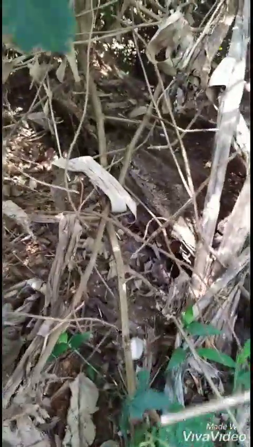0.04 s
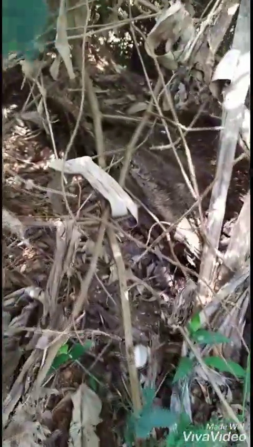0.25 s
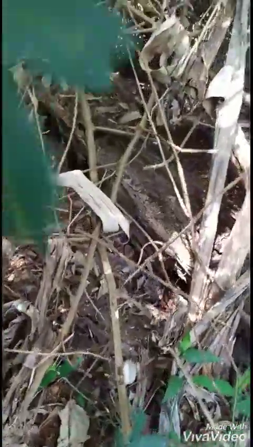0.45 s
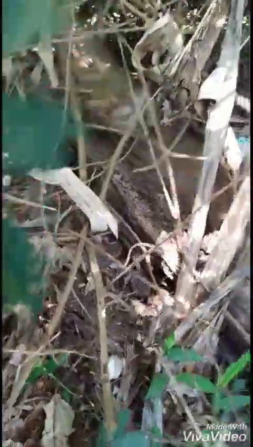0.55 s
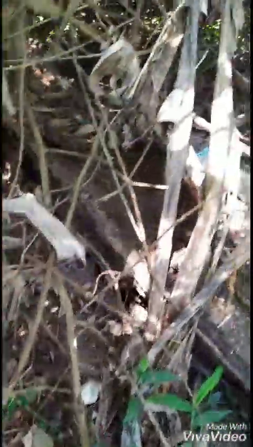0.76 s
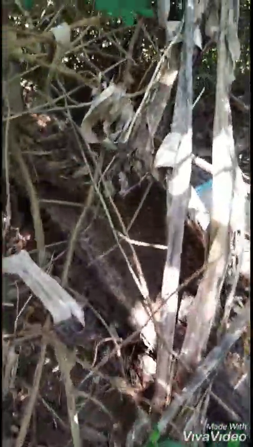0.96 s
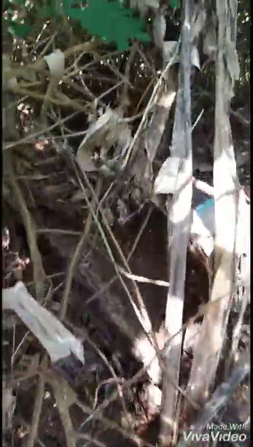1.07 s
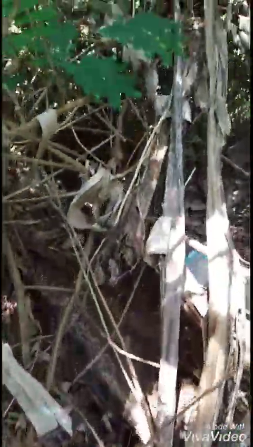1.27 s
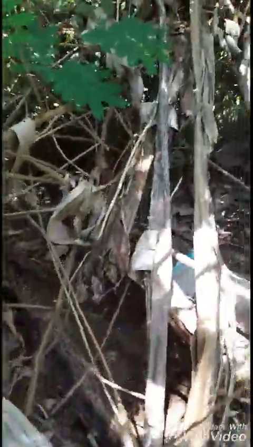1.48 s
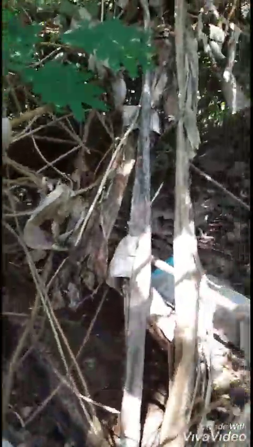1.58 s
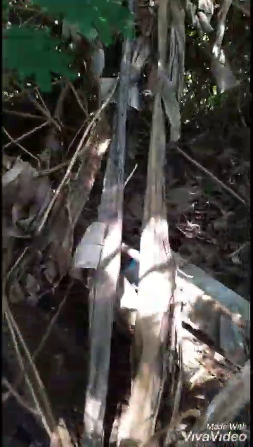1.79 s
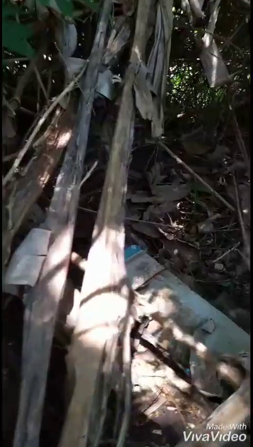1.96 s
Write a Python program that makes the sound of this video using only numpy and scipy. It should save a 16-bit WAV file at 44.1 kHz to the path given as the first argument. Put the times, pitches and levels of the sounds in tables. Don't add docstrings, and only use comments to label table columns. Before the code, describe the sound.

Dry leaves and brush rustle softly, twigs ticking, then a hard shove crackles with sharp snaps

```python
import sys
import numpy as np
from scipy import signal
from scipy.fft import rfft, irfft
from scipy.io import wavfile
from scipy.ndimage import uniform_filter1d

SR = 44100
rng = np.random.default_rng(int(sys.argv[2]) if len(sys.argv) > 2 else 0)


def waveform_to_disk(signal):
    frames = np.transpose(np.atleast_2d(signal))
    scaled = np.clip(frames, -1, 1) * 32767
    samples = np.round(scaled).astype(np.int16)
    wavfile.write(sys.argv[1], SR, samples)


def volts_from_db(level):
    exponent = np.asarray(level, float) / 20
    return 10 ** exponent


N = 89214
LAG_S = 0.0004363


def evened(x):
    return x / np.sqrt(np.mean(x ** 2) + 1e-20)


def read(points, hz):
    f, value = np.transpose(points)
    return np.interp(np.log(hz + 1), np.log(f + 1), value)


def coloured(x, points, lag_s=0.):
    hz = np.fft.rfftfreq(x.shape[-1], 1 / SR)
    delay = np.exp(-2j * np.pi * hz * lag_s)
    return irfft(rfft(x) * volts_from_db(read(points, hz)) * delay, x.shape[-1])


# f/Hz, level/dB
SHADOW = [(300, -2), (2000, -4), (8000, -3.5), (14000, -7.5)]


def shadowed(x, lag_s=0.):
    return coloured(x, SHADOW, lag_s)


def paired(a, b, likeness):
    hz = np.fft.rfftfreq(N, 1 / SR)
    same = np.clip(read(likeness, hz), 0, 1)
    shared = same * rfft(a) * np.exp(-2j * np.pi * hz * LAG_S)
    own = np.sqrt(1 - same ** 2) * rfft(b)
    return np.array([a, irfft(shared + own, N)])


def add(mix, s, sound):
    part = mix[:, round(s * SR):][:, :sound.shape[1]]
    part += sound[:, :part.shape[1]]


def smoothed(x, n):
    return uniform_filter1d(uniform_filter1d(x, n), n)


def drift(width_s):
    return evened(smoothed(rng.standard_normal(N), max(int(width_s * SR), 2)))


# f/Hz, level/dB
AIR_COLOUR = [(12, -76), (20, -18), (75, 0), (147, -24.5), (244, -21.5), (1050, -22), (1790, -29.5),
              (13200, -32), (16500, -39)]
# f/Hz, likeness (0 to 1)
AIR_SAME = [(60, 0.72), (300, 1), (900, 0.56), (3000, 0.13), (10000, 0.047)]
# t/s, level/dB
RUMBLE = [(0.0, -102), (0.032, -53.5), (0.51, -66.5), (0.56, -47), (0.59, -58), (0.68, -51.5), (0.71, -66),
          (0.771, -50.5), (0.8, -59), (1.24, -56), (1.26, -58.5), (1.56, -65), (1.61, -49.5), (1.65, -69),
          (1.72, -51.5), (1.74, -54.5), (1.88, -58.5), (2.02, -69)]


def air():
    a, b = coloured(rng.standard_normal((2, N)), AIR_COLOUR)
    both = volts_from_db(-55.5) * evened(paired(a, b, AIR_SAME))
    below_96_hz = signal.butter(4, 96, fs=SR, output="sos")
    low = signal.sosfiltfilt(below_96_hz, both)
    hiss = (both - low) * volts_from_db(1.7 * drift(0.15))
    lump = np.sqrt(smoothed((low ** 2).mean(0), 1500))
    swell = np.interp(np.arange(N) / SR, *np.transpose(RUMBLE))
    return hiss + low / lump * volts_from_db(swell)


def knock(s, db, hz):
    turns = np.arange(2048) / SR * hz
    decay = np.exp(-turns * 2 / 2.7)
    push = np.sin(2 * np.pi * turns) * decay * np.minimum(turns * 2, 1)
    return s, volts_from_db(db) * np.array([push, 0.91 * shadowed(push, LAG_S)])


# t/s, peak level/dB, f/Hz
KNOCKS = [(0.078, -63, 155), (0.831, -52, 525), (0.874, -56, 152), (0.899, -46, 314), (1.199, -47, 513),
          (1.245, -50.5, 244), (1.286, -47, 510), (1.33, -50.5, 235), (1.375, -47.5, 500),
          (1.453, -49, 173), (1.496, -47, 241), (1.627, -56, 162), (1.871, -40.5, 172), (1.939, -34.5, 334)]


def stems_and_soil(mix):
    for row in KNOCKS:
        add(mix, *knock(*row))


def crackle(clumps):
    grains_per_s, spread_db, swish_db, kinds = 2000, 2.6, -3, 16
    loudness = volts_from_db(spread_db * np.minimum(rng.exponential(1, N), 4))
    size = loudness * (rng.random(N) < grains_per_s * clumps / SR)
    kind = rng.integers(0, kinds, N)
    t = np.arange(300) / SR
    out = np.zeros(N)
    for k in range(kinds):
        decay_s = 0.00058 * rng.uniform(1.0, 3.2)
        grain = rng.standard_normal(len(t)) * np.exp(-t / decay_s)
        out += signal.oaconvolve(size * (kind == k), grain / np.linalg.norm(grain))[:N]
    return evened(out) + volts_from_db(swish_db) * rng.standard_normal(N)


def patchy(x):
    z = signal.stft(x, nperseg=256)[2]
    patches = uniform_filter1d(rng.standard_normal(z.shape[1:]), size=3, axis=0)
    patches = uniform_filter1d(patches, size=12, axis=1)
    return signal.istft(z * volts_from_db(3 * evened(patches)), nperseg=256)[1][:, :N]


# f/Hz, level/dB per Hz
LEAF_COLOUR = [(150, -16.5), (560, -16.5), (950, -8), (1250, -14.5), (2600, -6.5), (3450, -5), (4300, -6),
               (11700, -4), (15800, -9)]
# f/Hz, likeness (0 to 1)
LEAF_SAME = [(200, 0.89), (1300, 0.81), (2200, 0.15), (3500, 0.17), (5000, .15), (10000, 0.05)]
# t/s, rustle level/dB, left-right/dB
PUSH = [(0, -61, 8), (.09, -49.5, 3.5), (.14, -58, 4), (.4, -63.5, 2), (.546, -57.5, 5.5), (.553, -54, 2),
        (.63, -49, 3.5), (.757, -49.5, 4), (.78, -55, 2.5), (.97, -54.5, 1), (1.13, -70, 10),
        (1.2, -56, 2.5), (1.33, -58.5, 4), (1.37, -62.5, 1), (1.45, -60, 5), (1.47, -50, -3),
        (1.58, -56.5, 4.5), (1.67, -55, 2)]
# t/s, rustle level/dB, left-right/dB
SHOVE = [
    (1.679, -35.5, 4.5),
    (1.704, -41, 6.5),
    (1.71, -32.5, 5),
    (1.83, -32, 1.5),
    (1.87, -29, 2),
    (1.885, -29.5, 4.5),
    (1.96, -28.5, 0),
    (1.988, -35, 7),
    (2.005, -28.5, 2.5),
]


def leaves():
    t = np.arange(N) / SR
    s, db, pan_db = np.transpose(PUSH + SHOVE)
    clumps = volts_from_db(2.5 * drift(.002))
    a, b = coloured(np.array([crackle(clumps), crackle(clumps)]), LEAF_COLOUR)
    left, right = paired(a, b, LEAF_SAME)
    pan = np.interp(t, s, pan_db) / 2
    pair = np.array([evened(left) * volts_from_db(pan), evened(shadowed(right)) * volts_from_db(-pan)])
    return patchy(pair) * volts_from_db(np.interp(t, s, db) + .5 * drift(.01))


def resonance(hz, centre_hz, q):
    return 1 / (1 + 1j * q * (hz / centre_hz - centre_hz / hz))


# f/Hz, level/dB per Hz
CRACK_COLOUR = [(180, -52), (300, -26.5), (2650, -3), (3530, -1), (6450, -0.5), (13300, 0), (15600, 0),
                (16500, -24)]
RING_DB, BODY_DB = 7.5, -22.5


def snap(s, db, ring_hz, ring_db, body_db, length_ms):
    lead_s, same, pan_db, lift_db = .008, 0.54, 5.5, 1.3
    t = np.arange(2048) / SR - lead_s
    z = rng.standard_normal((4, 2048))
    z = np.sign(z) * abs(z) ** 1.25
    length = np.clip(length_ms, .3, 5) / 1000 * np.array([[1], [1.73]])
    rise = np.where(t < 0, 0.69, 1)
    burst = np.exp(-(t / (length * rise)) ** 2)
    tail = volts_from_db(-17) * (t > 0) * np.exp(-t / .008) * abs(z[3])
    drive = np.array([z[0], same * z[0] + np.sqrt(1 - same ** 2) * z[1]])
    hz = np.fft.rfftfreq(2048, 1 / SR) + 1
    ring = volts_from_db(ring_db) * resonance(hz, ring_hz, 8)
    body = volts_from_db(body_db) * resonance(hz, 890, 1)
    thud = volts_from_db(body_db - 3) * resonance(hz, 222, 2)
    tear = volts_from_db(read(CRACK_COLOUR, hz) - 9.0)
    broad = rfft(drive * (burst + tail)) * (tear + body + thud)
    left, right = irfft(broad + rfft(drive * burst) * ring, 2048)
    size = volts_from_db(db + lift_db) / np.sqrt(2 * uniform_filter1d(left ** 2, size=44).max())
    pair = np.array([left * volts_from_db(pan_db / 2), shadowed(right, LAG_S) * volts_from_db(-pan_db / 2)])
    return s - lead_s, size * pair


# t/s, level/dB, ring f/Hz
FLECKS = [(.0419, -48, 6000), (.0706, -48, 9000), (.1773, -52, 8000), (.2105, -51, 9000),
          (.2714, -52, 8000), (.3515, -54, 9000), (.419, -51, 9000), (.4657, -50, 11000),
          (.4752, -48, 8000), (.5675, -46, 12500), (.6997, -45, 8500), (.8488, -48, 8000),
          (.988, -46, 11000), (.9992, -48, 9000), (1.0656, -50, 4200), (1.085, -51, 6000),
          (1.092, -50, 5500), (1.2028, -49, 10500), (1.2596, -46, 6500), (1.2711, -48, 11000),
          (1.3128, -48, 11000), (1.4307, -51, 9000), (1.5275, -48, 8500), (1.5555, -48, 4000)]


def leaf_flecks(mix):
    for s, db, hz in FLECKS:
        add(mix, *snap(s, db, hz, RING_DB, BODY_DB, 1))


# t/s, level/dB, ring f/Hz, body level/dB, length/ms
TICKS = [(.0162, -46, 8600, -19, .9), (.0377, -38, 14500, -10, .8), (.0808, -36, 10800, -10, 1.1),
         (.1581, -48, 1500, -9, 1.5), (.2195, -42.5, 8460, -16, .8), (.3168, -48, 12000, -17, 1.5),
         (.4605, -38, 13100, -27, .9), (.5512, -43.5, 9100, -14, .9), (.5575, -50, 2200, -10, 1),
         (.6508, -43, 4500, -24, 1.5), (.7568, -43, 6000, -25, 1.5), (.8249, -45, 10600, -8, 1.2),
         (.8334, -45, 1410, -10, .8), (.8408, -41, 9000, -20, .8), (.876, -47, 11300, 1, 1.2),
         (.9299, -36, 8750, -24, 1), (1.1529, -47, 9000, -18, 1), (1.2499, -47, 4000, -12, 1.5),
         (1.2541, -40.5, 11000, -18, .7), (1.2666, -30, 6250, -28, 1.4), (1.3322, -46, 8000, -3, 1),
         (1.3387, -38, 8400, -25, .8), (1.4557, -44, 8180, -1, 1.2), (1.4627, -29, 7500, -20, .6),
         (1.4657, -39, 4500, -20, .5), (1.4717, -38, 10500, -20, .9), (1.4836, -42, 10500, -25, .7),
         (1.4929, -32, 4200, -18, .9), (1.4960, -37, 5200, -20, 1.2), (1.5033, -43, 8180, -18, 1.2)]


def stepping_twigs(mix):
    for s, db, hz, body_db, ms in TICKS:
        add(mix, *snap(s, db, hz, RING_DB, body_db, ms))


# t/s, level/dB, ring f/Hz, ring level/dB, length/ms
SNAPS = [(1.6777, -36, 9250, 1, 1.5), (1.7079, -30, 6000, -11, .8), (1.7114, -26, 9940, -3, 1.2),
         (1.7144, -26, 8500, -8, 1.2), (1.7196, -25, 9500, -6, .7), (1.748, -16, 11800, -2, .8),
         (1.7575, -29, 9000, -9, 1.5), (1.7655, -16, 9700, -3, 1.3), (1.7722, -28, 11000, -9, .8),
         (1.8041, -27, 5000, -5, .7), (1.8134, -23, 4300, 0, 1.3), (1.8196, -24, 13000, -5, .7),
         (1.8418, -26, 8900, -12, 1), (1.8453, -17, 4500, -6, 1.1), (1.8667, -27, 12000, -7, .5),
         (1.8807, -22, 2700, 2, 1.2), (1.9159, -17.5, 8000, 0, 1.8), (1.9294, -19, 7900, 0, .8),
         (1.9325, -24, 9000, -6, .4), (1.9485, -24, 2300, 4, 1.8), (1.9668, -20, 12800, -3, .7),
         (1.9725, -14, 2410, 6, .8), (1.982, -27, 8000, -6, .5), (2.0015, -25, 9500, -3, 1),
         (2.007, -23, 9000, -6, 1.2), (2.016, -25, 2500, 3, 1.4)]
# t/s, level/dB, ring f/Hz, ring level/dB, length/ms
STALK = (1.8775, -9.5, 6400, 0, .85)


def shove_snaps(mix):
    for s, db, hz, ring_db, ms in SNAPS + [STALK]:
        add(mix, *snap(s, db, hz, ring_db, BODY_DB, ms))


def scene():
    mix = air() + leaves()
    stems_and_soil(mix)
    leaf_flecks(mix)
    stepping_twigs(mix)
    shove_snaps(mix)
    return mix


def roll_off(x):
    return signal.sosfilt(signal.butter(12, 15600, fs=SR, output="sos"), x)


def record(dry):
    heard = coloured(dry, [(22, -12), (40, 0), (15600, 0), (16200, -9)])
    return roll_off(heard)


dry = scene()
out = record(dry)
waveform_to_disk(out)
```